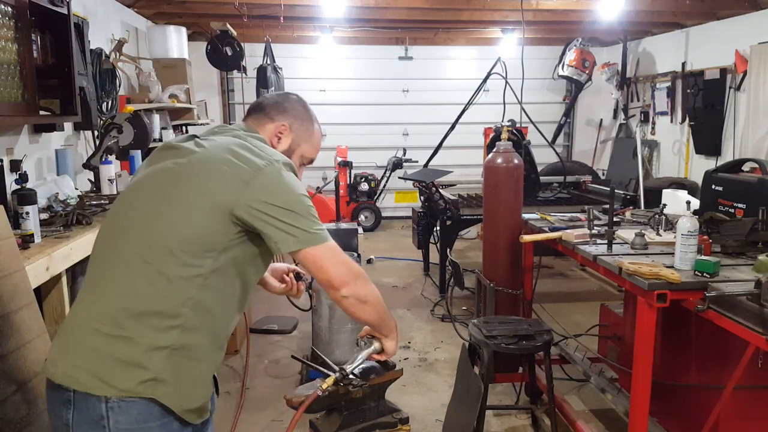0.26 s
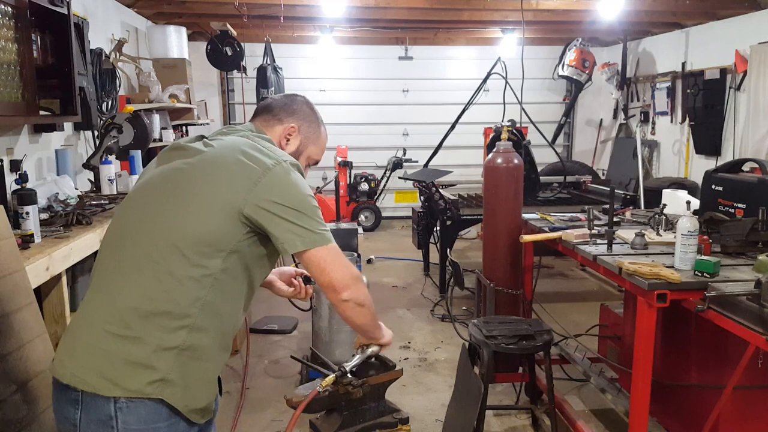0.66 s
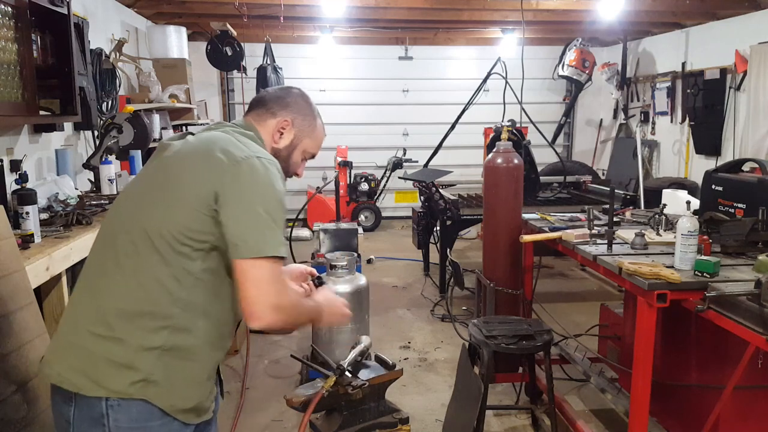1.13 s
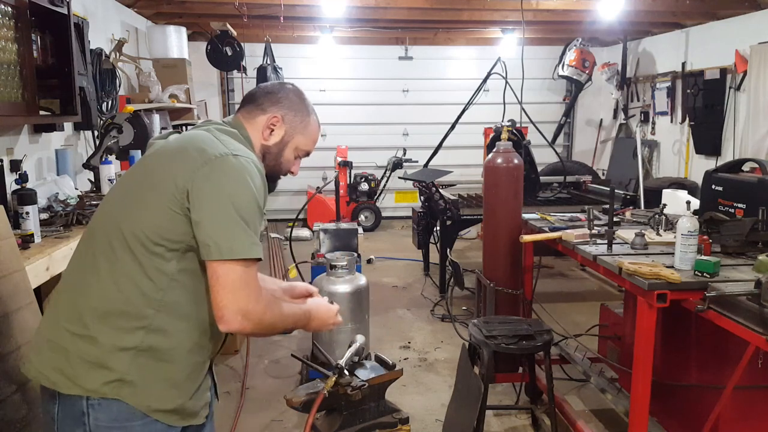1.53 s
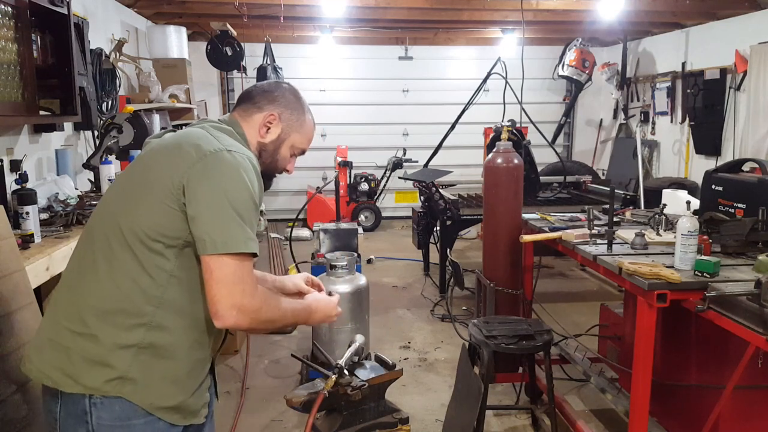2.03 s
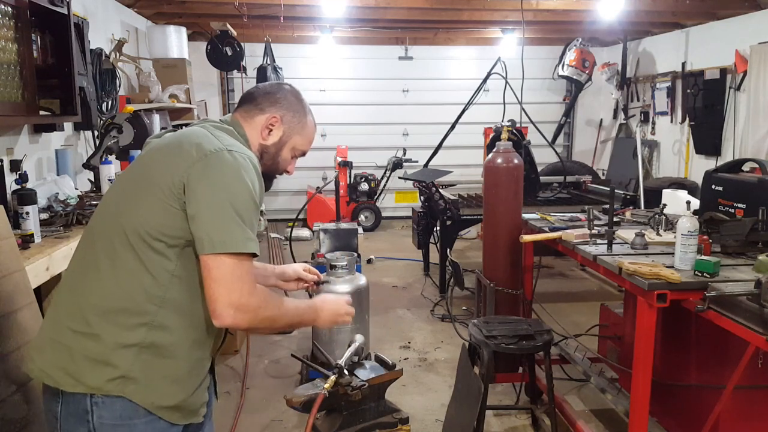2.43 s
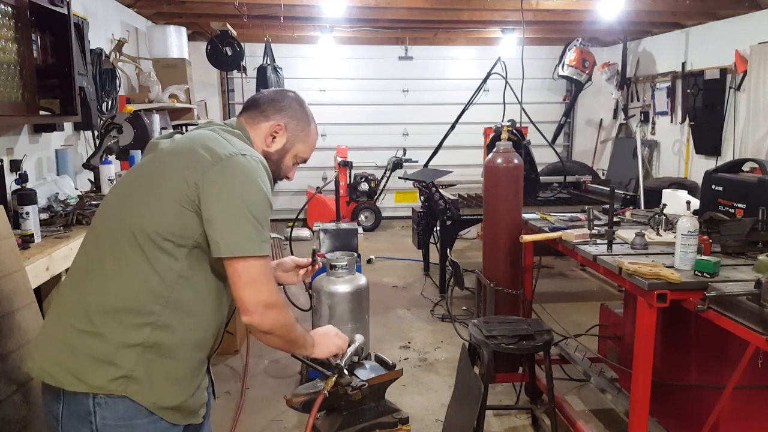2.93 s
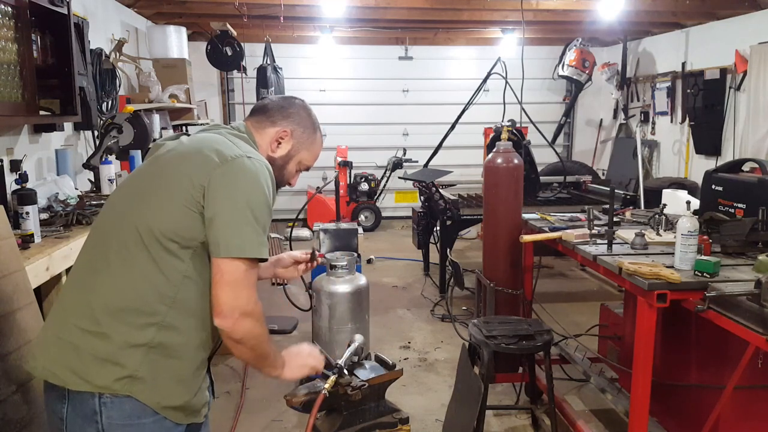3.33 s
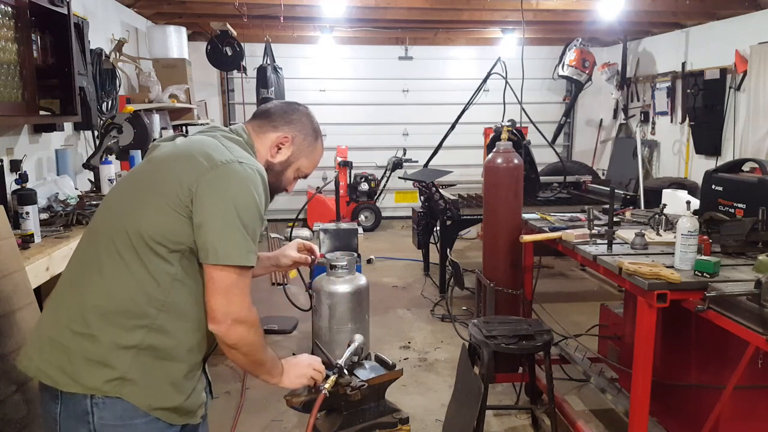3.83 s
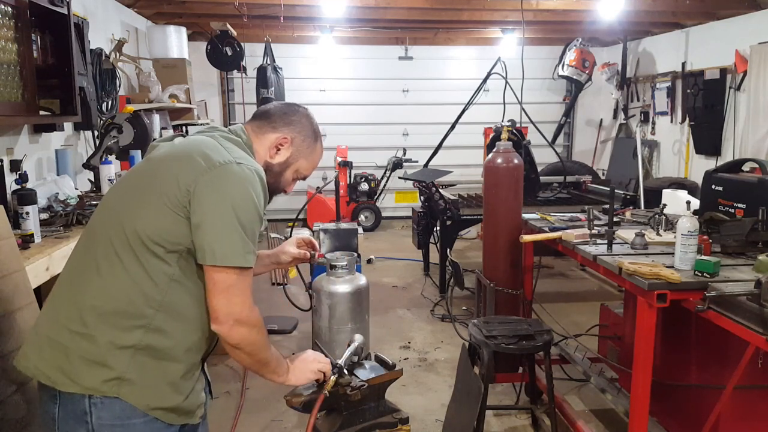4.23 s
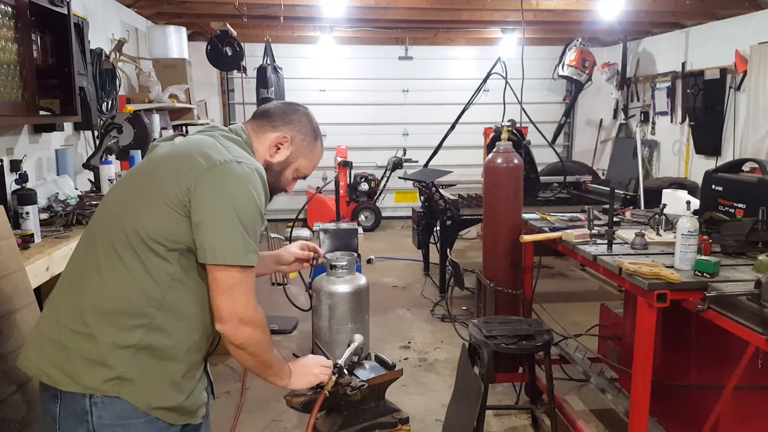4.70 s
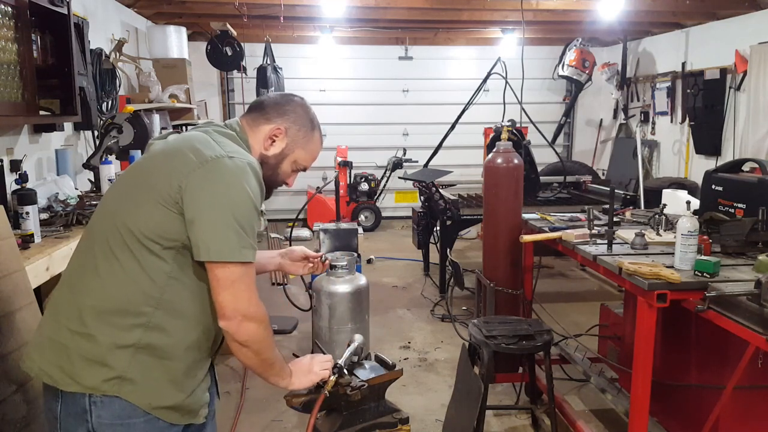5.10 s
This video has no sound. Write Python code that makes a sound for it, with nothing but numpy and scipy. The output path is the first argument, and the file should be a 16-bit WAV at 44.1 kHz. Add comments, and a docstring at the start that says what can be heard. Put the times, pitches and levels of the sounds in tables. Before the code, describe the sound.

In a reverberant garage workshop, a steel tool to the left of a stereo microphone gets a few dull knocks, then slams on an anvil in a hard, rapid clanging bounce. It rocks and rattles to rest. Near-silence follows, with thin high ticks of a small fitting, then sparse light clinks at a metal tank. Soft rustle comes early and late; low rumble and hum continue underneath.

```python
"""Air tool on a garage anvil

In a garage workshop, left of the stereo microphone, a steel air tool knocks, clangs hard and rocks to rest.
Then a small fitting ticks thinly and a metal tank's fittings clink; hand and sleeve rustle, early and late.
Each contact is a burst of noise plus decaying modes, answered by near surfaces and the hard room.
Beneath lie shaped noise for rumble and hiss, and a faint low hum of sines with wandering phase."""
import sys
import numpy as np
from scipy import signal
from scipy.fft import rfft, irfft, next_fast_len
from scipy.io import wavfile
from scipy.ndimage import map_coordinates

SR = 44100
rng = np.random.default_rng(int(sys.argv[2]) if len(sys.argv) > 2 else 0)


def store_wav(level_fs):
    """Save 16-bit WAV to argv[1]."""
    pcm = np.round(np.clip(np.atleast_2d(level_fs), -1, 1) * 32767)
    wavfile.write(sys.argv[1], SR, pcm.T.astype(np.int16))


N = 236183  # length of the scene (samples)
T = np.arange(SR * 3 // 5) / SR  # the life of one contact (s)
TOP_HZ = 16000  # band limit of the microphone


def amp(db):
    """Decibels to gain."""
    return 10 ** (np.asarray(db) / 20)


def unit(x):
    """x at rms 1."""
    return x / np.sqrt(np.mean(x ** 2) + 1e-20)


def struck(x):
    """x scaled so that its first 10 ms have rms 1."""
    return x / np.sqrt(np.mean(x[..., :SR // 100] ** 2))


def along(points, hz):
    """(frequency, value) points read on a log frequency axis."""
    f, v = np.transpose(points)
    return np.interp(np.log(hz + 1), np.log(f + 1), v)


def fade(t, t60):
    """A decay that loses 60 dB in t60 seconds."""
    return np.exp(-np.log(1000) * t / t60)


def filtered(x, response):
    """x times a response of frequency."""
    n = x.shape[-1]
    padded = next_fast_len(n + 8192)
    spectrum = rfft(x, padded) * response(np.fft.rfftfreq(padded, 1 / SR))
    return irfft(spectrum, padded)[..., :n]


def coloured(x, colour, tilt_db=0):
    """x through a causal minimum-phase filter with the given spectrum, tilted about 4 kHz (dB per octave)."""
    n = 2 * len(T)
    hz = np.fft.rfftfreq(n, 1 / SR)
    octaves = np.log2(np.clip(hz, 1500, 9000) / 4000)  # the tilt stops at 1.5 and 9 kHz
    db = along(colour, hz) + tilt_db * octaves
    # folding the cepstrum onto positive times makes the filter causal
    cepstrum = irfft(np.log(amp(db)), n)
    cepstrum[1:n // 2] *= 2
    cepstrum[n // 2 + 1:] = 0
    return irfft(rfft(x, n) * np.exp(rfft(cepstrum)), n)[:len(T)]


def noise_pair(alike, size):
    """Left and right noise, mixed from mid and side for a likeness that depends on frequency."""
    def mid_and_side(hz):
        turn = np.arccos(np.clip(along(alike, hz), -1, 1)) / 2
        return np.array([np.cos(turn), np.sin(turn)])
    mid, side = filtered(rng.standard_normal((2, size)), mid_and_side)
    return np.array([mid + side, mid - side])


def add(track, s, sound):
    """Mix a sound into the track at time s."""
    part = track[:, round(s * SR):][:, :len(T)]
    part += sound[..., :part.shape[1]]


def crack(t60, rise=0.0025):
    """The dense chatter of one contact: noise that swells, dies quickly and has a nearly flat spectrum."""
    z = rfft(rng.standard_normal(len(T)) * fade(T, t60) * (1 - fade(T, rise)) ** 2)
    flat = irfft(z / np.abs(z), len(T))  # keep the phases, level the strengths
    return flat * (T < 2 * t60) * (1 - fade(T, rise))


def ring(modes, t60, scatter_db=2.5):
    """Modes struck at random strengths and phases; t60 holds at 3 kHz and higher modes die sooner."""
    hz, db = np.transpose(modes)[:, :, None]
    chance = rng.standard_normal((len(hz), 2, 1))
    waves = np.sin(2 * np.pi * hz * T + np.pi * chance[:, 0])
    strengths = amp(db + scatter_db * chance[:, 1])
    return struck(np.sum(strengths * waves * fade(T, t60 * (3000 / hz) ** 0.068), axis=0))


# the tool slams on the anvil and bounces: (time [s], level [dB])
CLANGS = [(.7001, -34.5), (.7038, -34.5), (.716, -39), (.7282, -28), (.7308, -23.5), (.7348, -22),
          (.744, -27), (.7596, -29), (.784, -38.5)]
# modes of the hard blow: (frequency [Hz], level [dB])
CLANG_MODES = [(2051, -8), (2132, -2.5), (2482, -5), (2513, -3.5), (2830, -4.5), (2897, -4.5), (2922, -1.5),
               (3012, -6), (3225, -9), (4393, -6.5), (4817, -7.5), (5181, -8.5), (5272, -8), (5299, -5.5),
               (5631, -1.5), (6140, -10), (6994, -7.5), (7035, -5), (7074, -4.5), (7319, -2), (7368, -5),
               (7725, -8), (9484, -12)]
# colour of the hard contact: (frequency [Hz], density [dB per Hz])
CLANG_COLOUR = [(100, -28.5), (300, -17), (720, -17.5), (870, -22), (1150, -15), (1800, -1), (2300, 0.5),
                (2680, -13), (3050, -2), (3750, -10), (5100, -4), (6500, -13.5), (7400, 2.5), (9000, -9),
                (16000, -26)]
# the highest modes, shared by clangs and rattle: (frequency [Hz], level [dB])
SHIMMER_MODES = [(8440, 2), (11250, -4.5), (11800, -6), (12520, -3), (13050, -1.5), (13200, 2.5),
                 (13400, 0), (14560, -5.5), (14850, -3.5), (15200, -5)]
# low modes of the anvil stand, heard under all but the ticks: (frequency [Hz], level [dB])
STAND_MODES = [(161, -1.5), (200, -5), (295, -2), (345, -1.5), (590, -6), (722, -2.5)]
# for each dB above the middling blow: contact tilt (dB per octave), loss of ring (dB), gain of shimmer (dB)
MIDDLE_BLOW_DB, BRIGHTEN_DB_PER_OCTAVE, CHOKE_DB, SPARKLE_DB = -30.5, 0.28, 0.32, 0.53


def clangs():
    """The tool slams on the anvil: its modes decay fast, then slowly; harder blows are brighter and ring less."""
    out = np.zeros((2, N))
    for s, db in CLANGS:
        harder_db = db - MIDDLE_BLOW_DB
        ring_db = -CHOKE_DB * harder_db
        contact = amp(-0.5) * struck(coloured(crack(.03), CLANG_COLOUR, BRIGHTEN_DB_PER_OCTAVE * harder_db))
        choked = amp(ring_db - 5.5) * ring(CLANG_MODES, t60=0.046)
        free = amp(ring_db - 4.5) * ring(CLANG_MODES, t60=0.19)
        shimmer = amp(SPARKLE_DB * harder_db - 17.5) * ring(SHIMMER_MODES, t60=0.038)
        stand = amp(-24.5) * ring(STAND_MODES, t60=0.16)
        add(out, s, amp(db) * garage(contact + choked + free + shimmer + stand, wet_db=2.0))
    return out


# the tool lands on one edge, then the other:
# (time [s], first edge level [dB], second edge level [dB], first edge treble tilt [dB per octave])
ROCKS = [(0.8602, -34, -34.5, -1), (1.107, -38, -32, 0), (1.1448, -33.5, -38.5, 0),
         (1.229, -33.5, -30, 0.5), (1.2914, -35.5, -32, -1.5)]
EDGE_GAP_S, EDGE_TILT_DB = .0108, 2  # the second edge lands this much later, and brighter (dB per octave)
# between and after landings it skids in light contacts:
# (start [s], length [s], level [dB], treble tilt [dB per octave])
SKIDS = [(1.033, .066, -47.5, -0.5), (1.166, .04, -39, 2), (1.319, .022, -47, -0.2)]
SKID_HZ, SKID_JITTER_S = 70, .0015  # contacts a second and the unevenness of their timing


def rocking_contacts():
    """(time, level, tilt) of every contact: two edges for each landing, and the chatter of the skids."""
    contacts = []
    for s, first_db, second_db, tilt_db in ROCKS:
        contacts.append((s, first_db, tilt_db))
        contacts.append((s + EDGE_GAP_S, second_db, tilt_db + EDGE_TILT_DB))
    for start, length, db, tilt_db in SKIDS:
        for s in np.arange(start, start + length, 1 / SKID_HZ):
            contacts.append((s + rng.normal(0, SKID_JITTER_S), db, tilt_db))
    return contacts


# modes of the rocking tool: (frequency [Hz], level [dB])
RATTLE_MODES = [(1688, -3.5), (1750, -4.5), (1963, 0), (2071, -2.5), (2833, -3), (2929, -4), (3290, -6),
                (3365, -4.5), (4317, -4.5), (4578, -6), (4858, -2.5), (5303, -12), (5624, -1), (6179, -3),
                (7076, -3), (7163, -7), (7469, 4.5), (7778, -6), (8927, -11.5)]
# colour of the rocking contacts: (frequency [Hz], density [dB per Hz])
RATTLE_COLOUR = [(100, -21.5), (300, -19), (900, -16.5), (1450, -16), (1720, 0.5), (1950, 1.5), (2350, -10),
                 (3200, -11.5), (4800, -9.5), (6700, -16), (7600, 2), (8600, -16.5), (10500, -17.5),
                 (16000, -51)]


def rattle():
    """Contacts as the tool rocks to rest; the brighter ones stir the highest modes more."""
    out = np.zeros((2, N))
    for s, db, tilt_db in rocking_contacts():
        contact = amp(-1.5) * struck(coloured(crack(0.0198, rise=0.00213), RATTLE_COLOUR, tilt_db))
        steel = amp(-5.5) * ring(RATTLE_MODES, t60=0.051) + amp(-9.0) * ring(RATTLE_MODES, t60=0.11)
        shimmer = amp(tilt_db - 21) * ring(SHIMMER_MODES, t60=0.052)
        stand = amp(-31) * ring(STAND_MODES, t60=0.12)
        add(out, s, amp(db) * garage(contact + steel + shimmer + stand, wet_db=3))
    return out


# colour of the stand's dull push: (frequency [Hz], density [dB per Hz])
THUMP_COLOUR = [(60, -25), (160, -2.5), (260, -1), (380, -1.5), (600, -3), (900, -13), (2000, -35.5),
                (8000, -62)]


def thump():
    """The heavy stand answers a tap with a dull push and low modes that build up slowly."""
    push = amp(-0.5) * struck(coloured(crack(.035), THUMP_COLOUR))
    return push + amp(-2) * ring(STAND_MODES, t60=0.091) * (1 - fade(T, 0.049))


# the tool is shifted and knocks:
# (time [s], level [dB], treble cut-off of the contact [Hz], ring [Hz], ring level [dB], thump level [dB])
KNOCKS = [(.3105, -43, 4900, 4797, -8.5, -12), (.4866, -56, 3900, 1850, -5.5, 4),
          (.501, -64.5, 3000, 8270, -13.5, 9.5), (.561, -58.5, 2100, 1061, -1, -2),
          (.575, -58, 1900, 1260, -2.5, -1.5), (1.0155, -38.5, 15000, 958, -9, -28)]
# modes of the knocked tool: (frequency [Hz], level [dB])
KNOCK_MODES = [(1448, 3.5), (1790, -2), (1997, -2.5), (2159, -0.5), (2783, -5), (3130, -3), (3570, -9.5),
               (3854, -5), (7434, -4), (11760, -1)]
# colour of the knocks: (frequency [Hz], density [dB per Hz])
KNOCK_COLOUR = [(100, -26.5), (800, -11), (1150, -4.5), (1800, 1.5), (3200, -2.5), (4800, -5.5),
                (6500, -8.5), (8200, -4), (10000, -15.5), (12000, -4), (16000, -14.5)]
SOFT_DB_PER_OCTAVE = 22.5  # fall of a knock's treble above its cut-off


def knocks():
    """The hand-damped tool knocks on the anvil: softer contacts lose treble, and each spot has its own ring."""
    out = np.zeros((2, N))
    hz = np.geomspace(50, TOP_HZ, 40)
    for s, db, cutoff_hz, ring_hz, ring_db, thump_db in KNOCKS:
        softness = np.transpose([hz, -SOFT_DB_PER_OCTAVE * np.log2(np.maximum(hz / cutoff_hz, 1))])
        contact = struck(coloured(crack(0.0081, rise=0.00038), KNOCK_COLOUR))
        hard = contact + amp(-6.5) * ring(KNOCK_MODES, t60=0.034)
        tap = struck(coloured(hard, softness)) + amp(ring_db) * ring([(ring_hz, 0)], t60=0.058)
        add(out, s, amp(db) * garage(tap + amp(thump_db) * thump(), wet_db=2.5))
    return out


# light clinks at the tank's fittings:
# (time [s], level [dB], treble tilt [dB per octave], ring [Hz], ring level [dB], thump level [dB])
CLINKS = [(3.463, -53, 3.5, 1970, -14, -5.5), (3.581, -63, 0, 1930, -11, -8),
          (4.174, -54, -1.2, 1710, -2.5, -9), (4.533, -74.5, -6, 590, -1, 6.5),
          (4.561, -75, -11, 610, -1, 1), (5.019, -72, -9.5, 7040, -6, 1)]
# the fitting's crowded high modes: (frequency [Hz], level [dB])
FITTING_MODES = [(3698, -4), (3989, -1.5), (4172, 0), (4520, 4), (4899, -3), (6573, -8), (7060, -1),
                 (7537, 9), (7752, -31), (8349, 12)]
# colour of the clinks: (frequency [Hz], density [dB per Hz])
CLINK_COLOUR = [(100, -23), (1000, -21), (1800, -1.5), (2500, -6.5), (3200, -5.5), (4500, -4),
                (5600, -11.5), (6800, 3), (8000, 2), (9400, -17), (14000, -13), (16000, -13)]


def clinks():
    """A metal fitting is tapped: a click, a short cluster of high modes, one ring set by the spot, and a thump."""
    out = np.zeros((2, N))
    for s, db, tilt_db, ring_hz, ring_db, thump_db in CLINKS:
        click = struck(coloured(crack(0.015, rise=0.00087), CLINK_COLOUR, tilt_db))
        cluster = amp(-6) * ring(FITTING_MODES, t60=0.027)
        spot = amp(ring_db) * ring([(ring_hz, 0)], t60=0.031)
        tap = click + cluster + spot + amp(thump_db) * thump()
        add(out, s, amp(db) * garage(tap, wet_db=5.5))
    return out


# ticks of a small fitting: (time [s], level [dB], ring level [dB])
TICKS = [(1.540, -76, 0), (1.7193, -68.5, -0.5), (2.108, -85.5, -4), (2.296, -75, -3), (2.331, -61, -9)]
# colour of the ticks: (frequency [Hz], density [dB per Hz])
TICK_COLOUR = [(200, -13), (2000, -10.5), (5200, -14.5), (6400, -4), (7400, -8), (8200, 1.5), (9000, -12),
               (10000, -14), (12000, -16), (16000, -9.5)]


def ticks():
    """A small fitting clicks in the room and rings with a thin, high note of two close modes."""
    out = np.zeros((2, N))
    for s, db, ring_db in TICKS:
        click = garage(struck(coloured(crack(0.017), TICK_COLOUR)), wet_db=7.0)
        note = ring([(8060, 0), (8130, -4)], t60=0.58)
        add(out, s, amp(db) * (click + amp(ring_db) * note))
    return out


# hand and sleeve brush along the hose: (start [s], length [s], level [dB])
RUSTLES = [(0, 1.1, -71.5), (0.391, .25, -67.5), (4.2, 1.27, -79.5)]
# colour of the brushing: (frequency [Hz], density [dB per Hz])
RUSTLE_COLOUR = [(60, -25), (150, -12.5), (300, -0.5), (560, 4), (850, -6), (2000, -4.5), (3500, -6.5),
                 (6000, -20), (16000, -37)]
RUSTLE_ATTACK_S, RUSTLE_RELEASE_S = 0.0064, 0.12


def rustles():
    """Soft brushing of hand and sleeve: shaped noise under straight-sided swells."""
    t = np.arange(N) / SR
    brush = unit(filtered(noise_pair(WALLS_ALIKE, N), lambda hz: amp(along(RUSTLE_COLOUR, hz))))
    level = np.zeros(N)
    for start, length, db in RUSTLES:
        attack = (t - start) / RUSTLE_ATTACK_S
        release = (start + length - t) / RUSTLE_RELEASE_S
        level += amp(db) * np.clip(np.minimum(attack, release), 0, 1)
    return brush * level


# decay of the room's tail: (frequency [Hz], t60 [s])
GARAGE = [(150, 0.11), (400, .55), (1000, 0.32), (2000, 0.43), (4000, .45), (7500, 0.3), (14000, 0.35)]
# likeness of the two channels in the tail and the rustle: (frequency [Hz], left-right likeness [-1 to 1])
WALLS_ALIKE = [(150, 0.28), (500, 0.43), (1500, 0.13), (5000, 0.039)]


def garage(x, wet_db, near_db=-3, near_t60=0.062):
    """Direct sound, a scatter from floor and benches close by, and the tail of the room."""
    _, t, z = signal.stft(noise_pair(WALLS_ALIKE, len(T)), SR, nperseg=256)
    decaying = z * fade(t, along(GARAGE, t60_hz := np.fft.rfftfreq(256, 1 / SR))[:, None])
    tail = signal.istft(decaying, SR, nperseg=256)[1][:, :len(T)]
    tail = tail * (1 - fade(T, 0.042))  # the tail builds up gradually
    # the fifth power leaves a few strong reflections, none before 2 ms
    near = rng.standard_normal((2, len(T))) ** 5 * fade(T, near_t60) * (T > .002)
    answer = (amp(wet_db) * unit(tail) + amp(near_db) * unit(near)) / np.sqrt(len(T))
    return x + signal.fftconvolve(x[None], answer, axes=1)[:, :len(T)]


# colour of rumble and hiss: (frequency [Hz], density [dB per Hz])
AIR = [(20, -17), (35, -13.5), (50, -6), (68, 0.5), (95, -2), (130, -3), (160, -10.5), (250, -13),
       (350, -14), (450, -17.5), (1200, -20), (5400, -30), (9000, -33.5), (14500, -32), (16000, -33)]
# likeness of the two channels in the air: (frequency [Hz], left-right likeness [-1 to 1])
AIR_ALIKE = [(60, .85), (130, .8), (250, .5), (550, .16), (1650, 0), (14000, 0)]
# machine hum, before the lean to the left: (frequency [Hz], level [dB])
HUM = [(61, -76), (71.5, -74.5), (86.1, -72), (97, -76.5), (120, -80.5), (312, -88), (360.7, -86),
       (479.1, -85.5), (597.5, -91), (721.4, -86)]
AIR_DB = -66.5  # before the lean to the left


def background():
    """Shaped noise for rumble and hiss, with a faint machine hum whose partials wander in phase."""
    t = np.arange(N) / SR
    air = unit(filtered(noise_pair(AIR_ALIKE, N), lambda hz: amp(along(AIR, hz))))
    hum = np.zeros(N)
    for hz, db in HUM:
        drift = map_coordinates(rng.standard_normal(32), [t * 4])  # smooth, four random points a second
        hum += amp(db) * np.sin(2 * np.pi * hz * t + 0.6 * drift)
    return (amp(AIR_DB) * air + hum) * amp([[1.3], [-1.3]])


# lean of contacts and rustle across the microphone: (frequency [Hz], left minus right [dB])
LEAN = [(60, 1), (92, 4.0), (140, 4), (210, 9), (330, 6.5), (500, 8), (770, 10), (1170, 10), (1790, 9.5),
        (2740, 11.5), (4190, 6.5), (6410, 3), (9810, 8), (15000, -4.5)]


def scene():
    """Contacts and rustle lean left, except in the highest treble, over the room's own sound."""
    def lean(hz):
        ratio = amp(along(LEAN, hz))
        return np.array([2 * ratio, 2 + 0 * hz]) / (1 + ratio)
    work = clangs() + rattle() + knocks() + clinks() + ticks() + rustles()
    return background() + filtered(work, lean)


def record(dry):
    """The microphone has a notch at 10 kHz, rounds the sharpest peaks and cuts steeply at its band limit."""
    notch = filtered(dry, lambda hz: amp(-7 * np.exp(-((hz - 10000) / 700) ** 2)))
    rounded = notch / (1 + np.abs(notch / .65) ** 4) ** (1 / 4)
    return filtered(rounded, lambda hz: 1 / (1 + (hz / TOP_HZ) ** 160))


dry = scene()
out = record(dry)
store_wav(out)
```